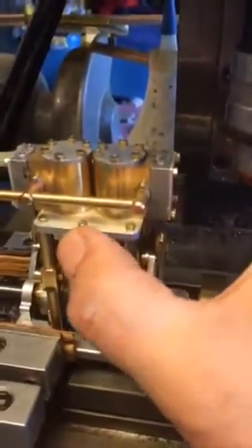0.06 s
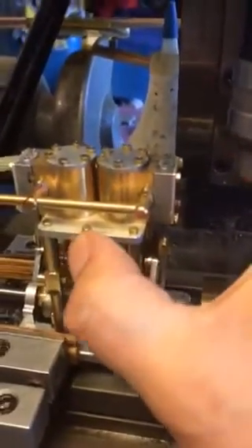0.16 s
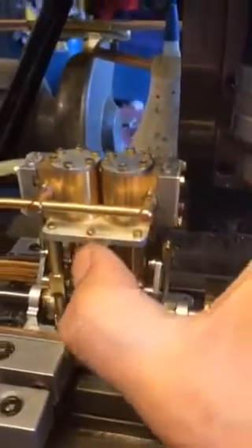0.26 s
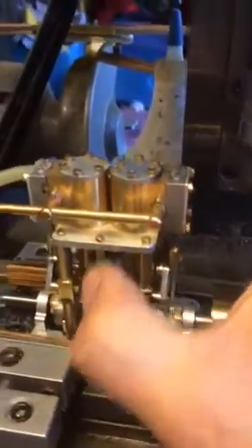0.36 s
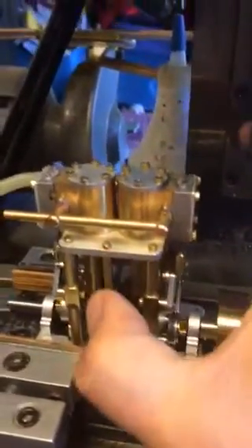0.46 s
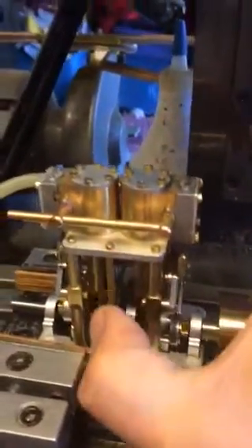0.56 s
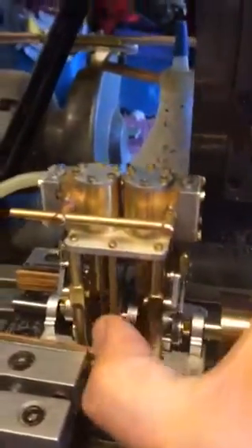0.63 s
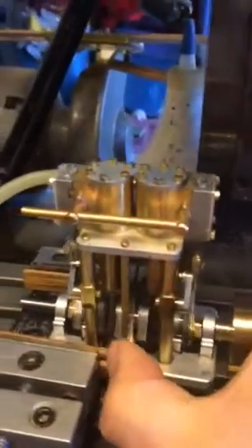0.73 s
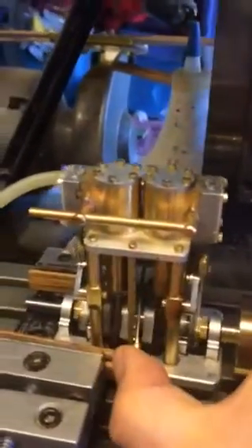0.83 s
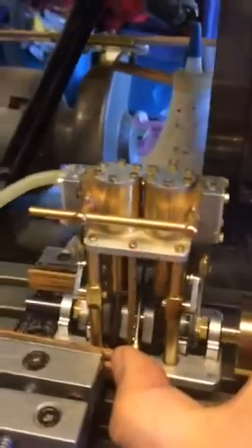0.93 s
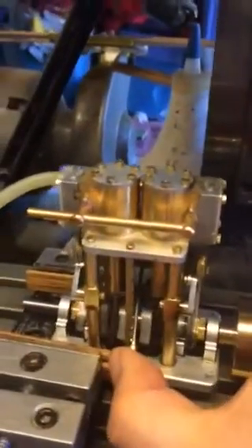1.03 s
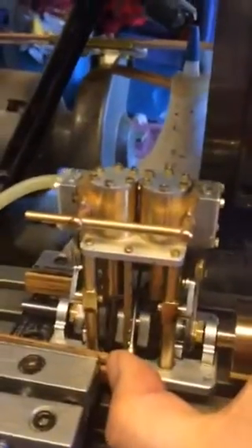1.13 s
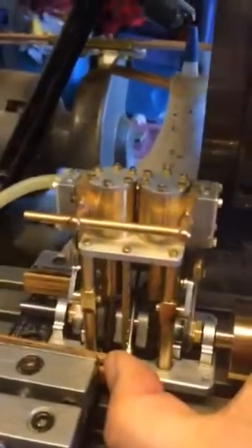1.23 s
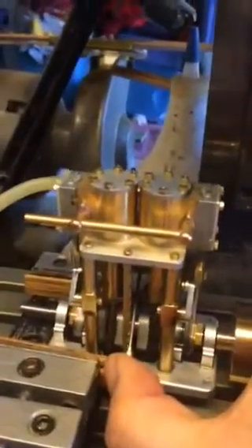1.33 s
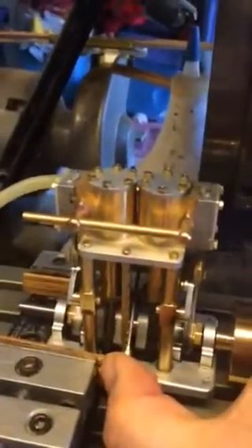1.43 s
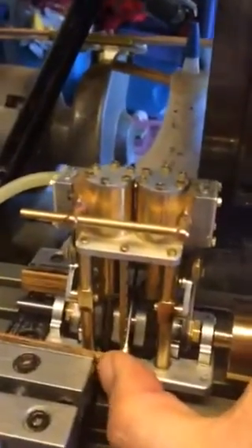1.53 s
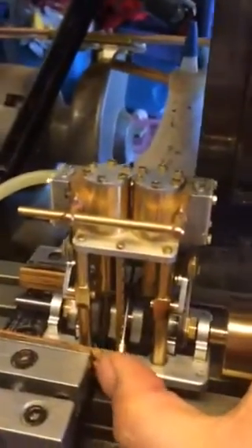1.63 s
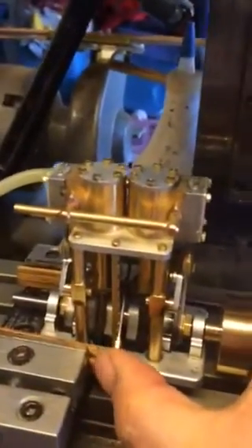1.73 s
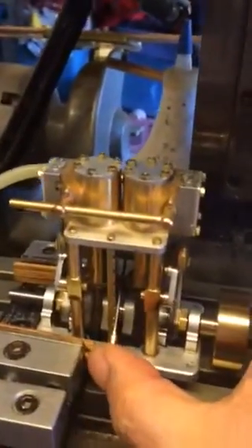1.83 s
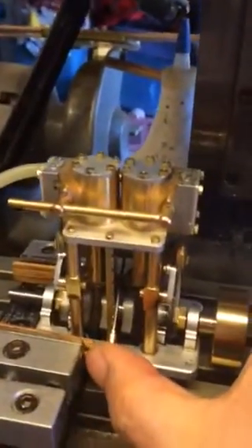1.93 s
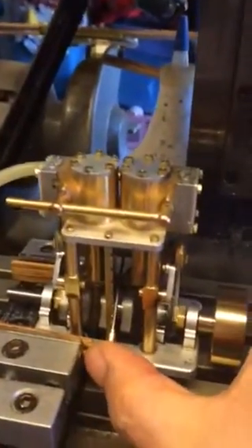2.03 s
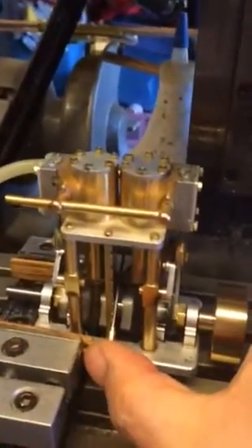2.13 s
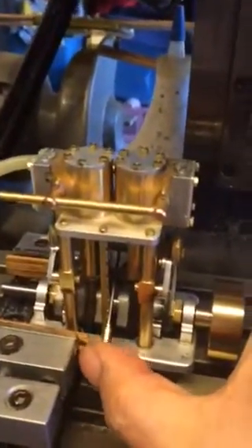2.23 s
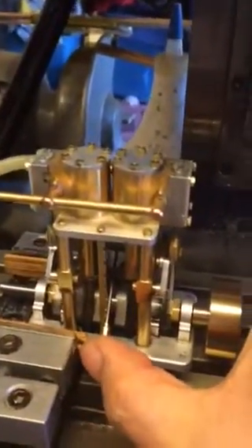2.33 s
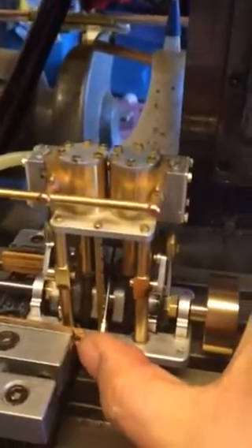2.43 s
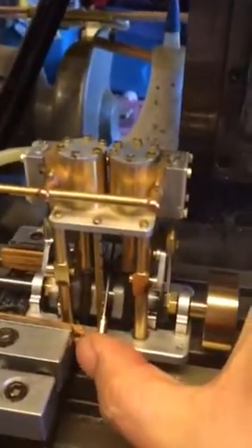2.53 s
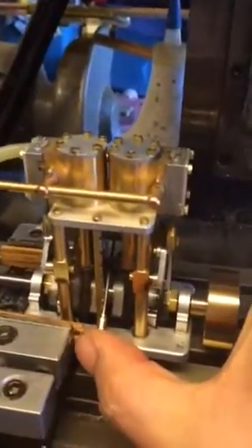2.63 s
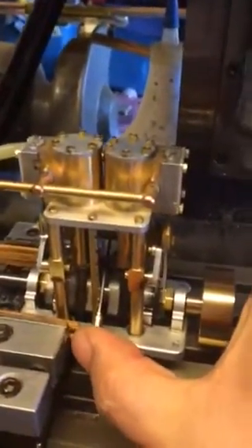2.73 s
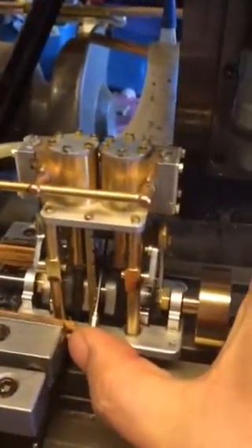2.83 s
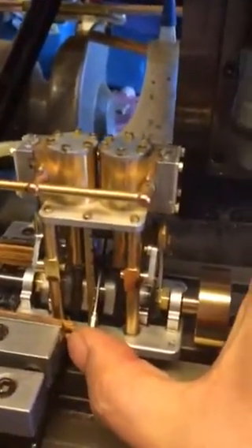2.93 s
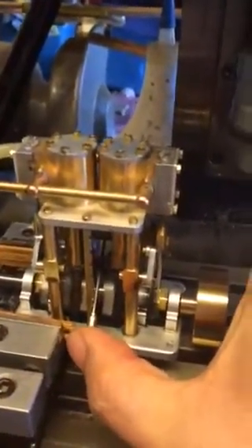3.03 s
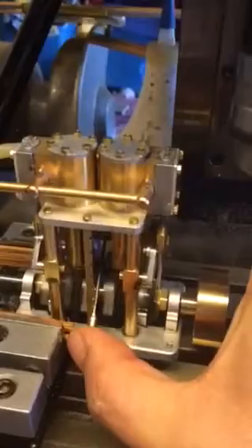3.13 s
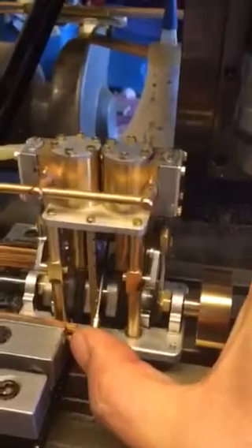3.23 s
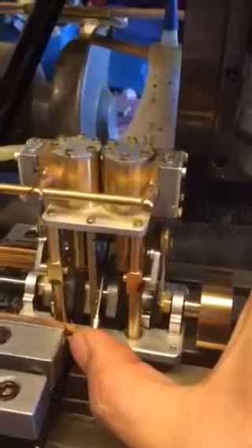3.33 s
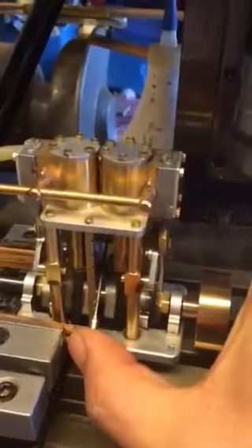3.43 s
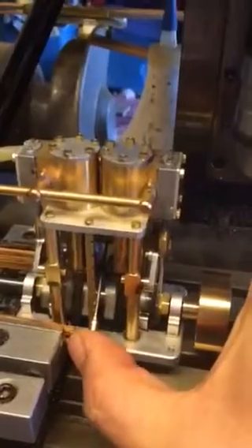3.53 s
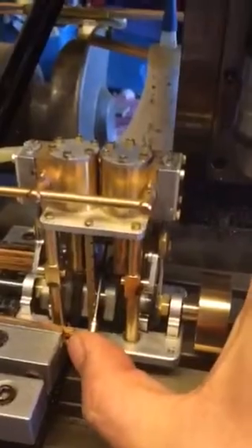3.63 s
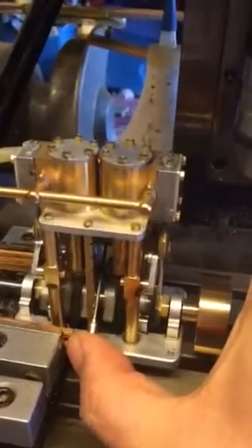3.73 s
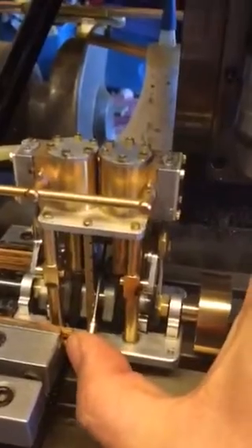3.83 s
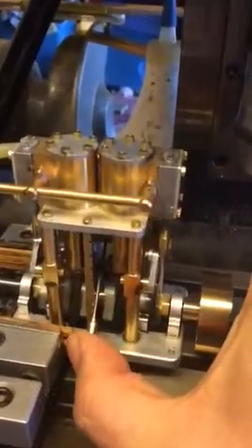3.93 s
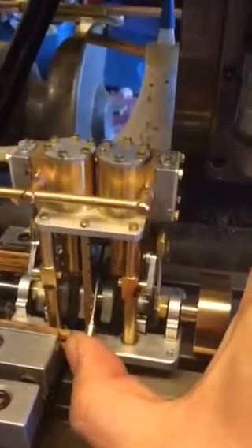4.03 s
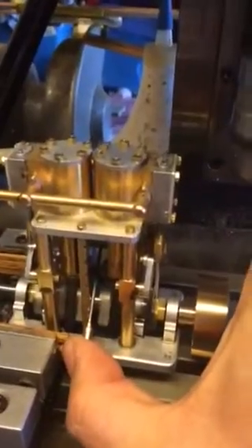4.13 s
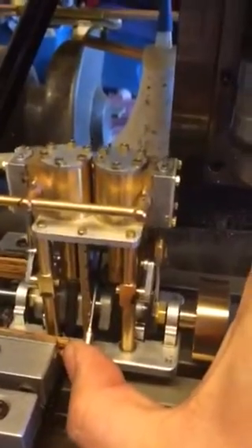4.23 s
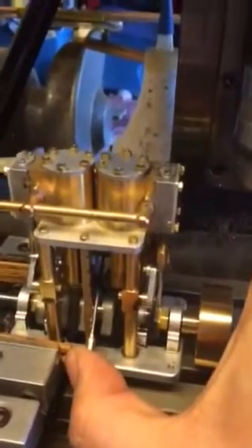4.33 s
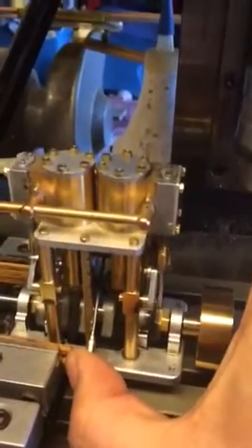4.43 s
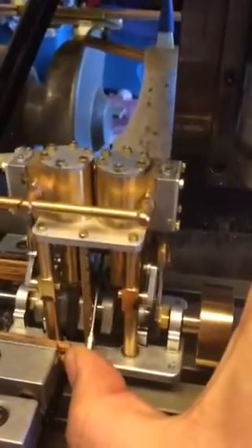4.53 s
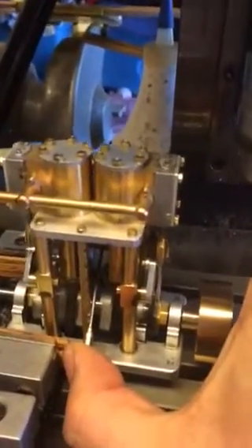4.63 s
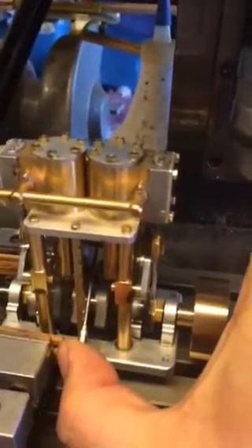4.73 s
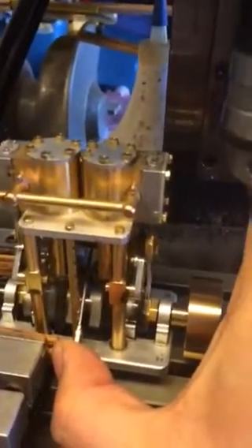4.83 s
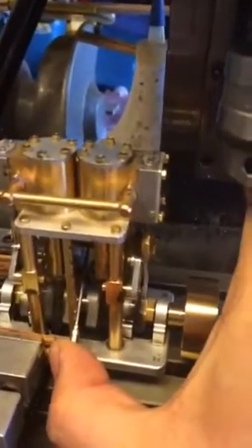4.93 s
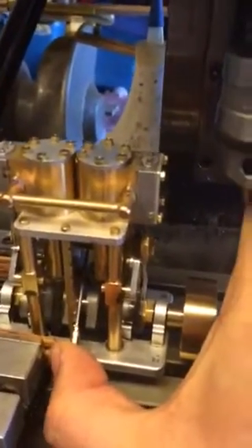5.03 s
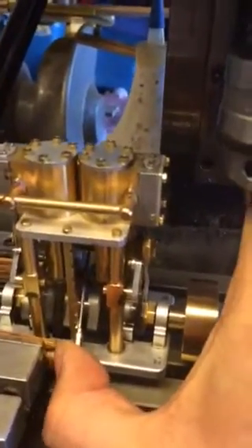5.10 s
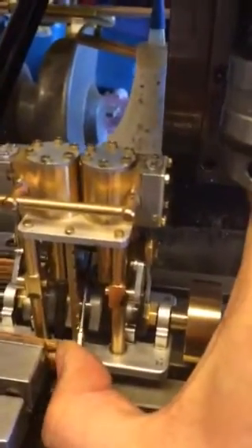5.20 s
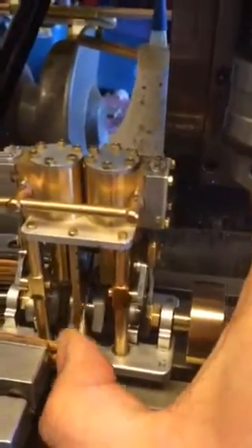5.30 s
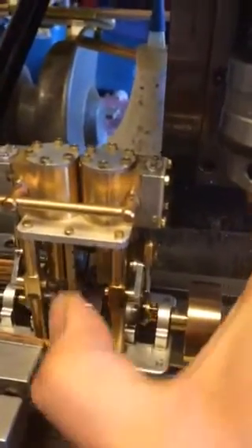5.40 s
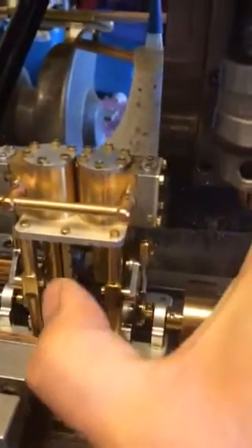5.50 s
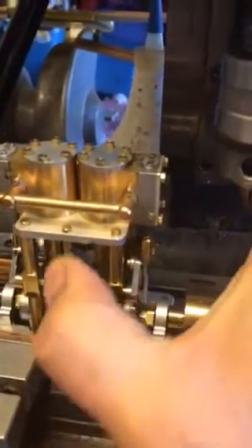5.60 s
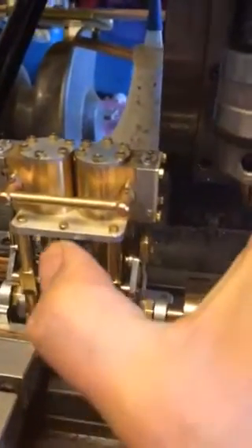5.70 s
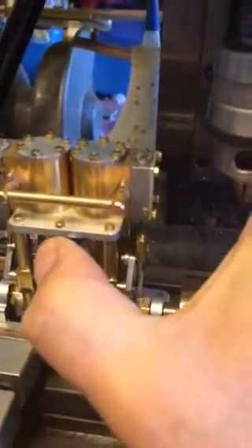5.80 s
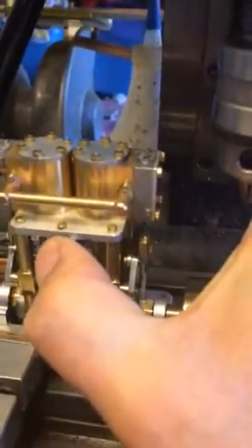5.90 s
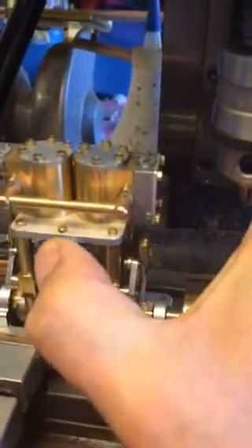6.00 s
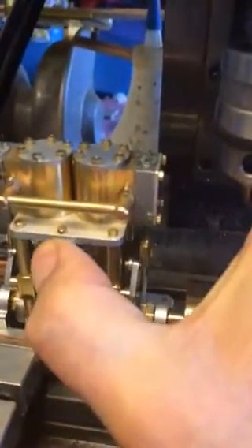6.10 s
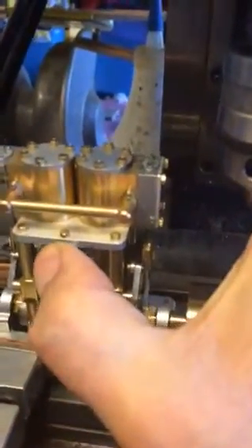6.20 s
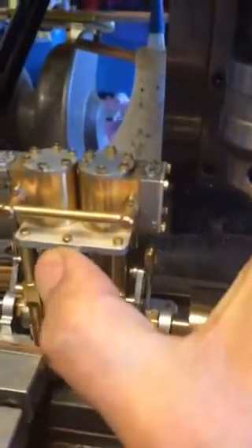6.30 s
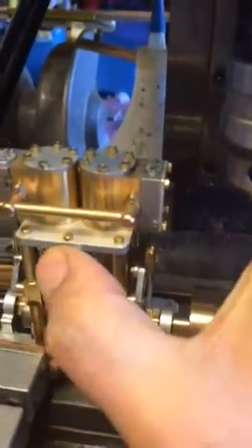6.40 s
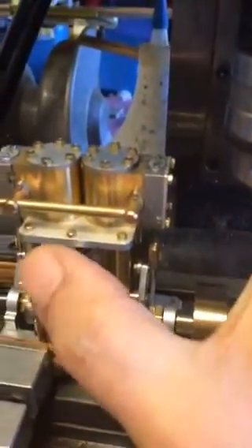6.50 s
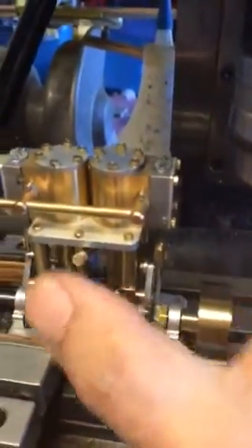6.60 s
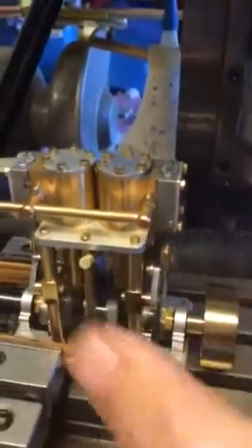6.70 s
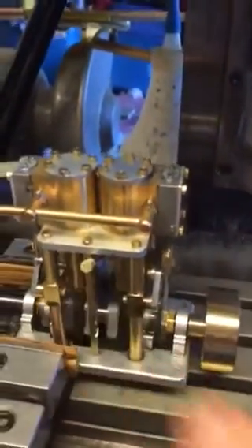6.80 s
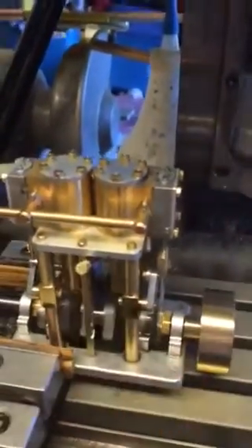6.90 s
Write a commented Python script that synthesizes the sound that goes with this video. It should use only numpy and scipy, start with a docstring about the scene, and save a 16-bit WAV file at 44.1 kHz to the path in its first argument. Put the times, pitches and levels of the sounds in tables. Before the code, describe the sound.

A small model steam engine runs fast on compressed air, close by, with a bright pulsing hiss over a buzzing drone and light, rapid metal knocking. Almost at once it stalls as the reversing lever clicks over, then spurts air and races off again. It runs steadily for several seconds, stops briefly once more with clicks and spurts, and resumes. Behind it is a quiet workshop.

```python
"""A small twin-cylinder model steam engine runs on compressed air, close by on a lathe bed.
Five uneven exhaust beats a turn make its drone. Air hisses from its ports (the cylinder openings)
in step with the crank, drops of oil spit, and the rods knock. Twice a thumb throws the reversing
lever: the engine stalls, spurts air and races off the other way, while the link rubs and clicks.
Behind it all is the low, steady noise of a quiet workshop."""
import sys
import numpy as np
from scipy import signal
from scipy.fft import rfft, irfft, next_fast_len
from scipy.io import wavfile

SR = 44100
rng = np.random.default_rng(int(sys.argv[2]) if len(sys.argv) > 2 else 0)


def bounce(signal):
    """Save signal as a 16-bit WAV file at the path given by the first command-line argument."""
    frames = np.transpose(np.atleast_2d(signal))
    limited = np.clip(frames, -1, 1)
    pcm = np.round(limited * 32767).astype(np.int16)
    wavfile.write(sys.argv[1], SR, pcm)


N = 306759
TIME = np.arange(N) / SR
FFT_SIZE = next_fast_len(N + 8192, True)
FREQS = np.fft.rfftfreq(FFT_SIZE, 1 / SR)

# How the crank moves in each run. Each row: start, stop and braking time in seconds,
# cruising speed and surge in turns per second, first angle in turns.
CRANK_RUNS = [(-2, .58, .05, 35.3435, 0, -.042), (.8084, 5.48, .0367, 39.8216, 35.9, .3548),
              (5.7029, 9, .05, 35.3123, 18.6, -.3594)]
# The air supply in each run. Each row, all in seconds: when it opens, how long that takes,
# when it shuts, how long the hiss lingers, how long the early boost takes to ease off.
AIR_RUNS = [(-1.5, .01, 0.473, 0.013, .1), (0.8445, 0.031, 5.408, 0.0041, .08),
            (5.737, 0.0028, 9, .01, 0.4)]
# Exhaust beats in one turn. Each row: crank angle in turns, size of the pressure drop,
# recovery in turns, size of the piston's thump.
FORWARD_BEATS = [(.088, .594, .029, .564), (.351, .641, .07, .773), (.546, .196, .01, .393),
                 (.633, .121, .008, .076), (.789, 0.75, 0.091, 0.65)]
BACKWARD_BEATS = [(.118, 0.2, 0.016, 0.51), (.36, .707, 0.046, .622), (.55, 1.626, 0.16, 0.61),
                  (.639, 0.41, 0.089, 0.24), (.816, 0.48, 0.044, 0.4)]
# Four ports each blow once a turn. Each row: crank angle and half width in turns, level in dB.
FORWARD_PORTS = [(.17, .07, -1.5), (.44, 0.12, 0.05), (0.608, .05, 0), (.875, .055, -2)]
BACKWARD_PORTS = [(.17, 0.081, -0.2), (.33, 0.12, 0), (.61, 0.094, -2.5), (.9, 0.065, -3)]
# Rod knocks in one turn. Each row: crank angle in turns, level in dB.
FORWARD_KNOCKS = [(.088, 7), (.36, 5), (.546, -3), (.625, 7), (.8, 2)]
BACKWARD_KNOCKS = [(0.117, 6.5), (0.36, 3), (.546, -8), (0.676, 5.5), (0.814, 0)]
# Resonances, the pitches at which a part likes to ring.
# Each row: pitch in Hz, width in Hz, level in dB going forward, level in dB going backward.
EXHAUST_TONES = [(118, 38.8, 15, 15), (395.4, 23, -5.5, -3.5), (576, 165, 4, 6), (728, 40, 7.5, 9.5),
                 (935, 57, -2, 0)]
PORT_TONES = [(3020, 550, -9.5, -10.5), (3810, 520, -9.5, -8.5), (5260, 950, -4, -2.5), (5820, 420, 0, 1.5),
              (6015, 280, -3, 2.5), (6730, 810, -4.5, -3), (7230, 560, -5, 1.5), (8040, 540, -4, -3),
              (8870, 460, -0.5, 0.5), (9280, 1500, -3.5, -4), (10000, 710, 0.5, 2), (11130, 920, -3.5, -1),
              (13000, 700, -5, -18), (13740, 470, -2.5, 1), (15400, 830, 0, 5)]   # ports and steam chests
FRAME_TONES = [(560, 69, -17, 11.5), (702, 54, 9, 2), (950, 200, 10, -12), (1297, 81, 10.5, 4.5),
               (1480, 190, -16, -2.5), (1680, 73, 6, -15), (2044, 67, 8.5, 6), (2320, 500, -2.5, -6.5),
               (3100, 160, 0, -5), (3290, 380, -3, -0.5), (3540, 260, -1, -13.5)]   # frame and rods
CROSSHEAD_TONES = [(1762, 28, 12, -29), (1970, 180, -0.5, -4), (2990, 59, 1, 0.5), (3340, 72, 3, -6),
                   (3980, 340, -6, 3)]   # the sliding joint at the end of a piston rod
# The tone of swirling exhaust air. Each row: frequency in Hz, level in dB.
RUSH_SPECTRUM = [(25, -16), (60, -3.5), (95, -0.5), (200, 2.5), (290, -4), (380, -1.5), (500, -2.5),
                 (650, -4.5), (950, -2), (1130, -7.5), (1900, -3), (2600, -8.5), (6000, -21.5),
                 (15000, -26)]
# Air spurts and link rubs. Each row: time of the peak in seconds, level in dB, length in seconds.
AIR_SPURTS = [(0.5, -24, 0.0091), (0.536, -54, 0.014), (.76, -54, 0.024), (0.811, -34, 0.0085),
              (.8225, -19.5, 0.0081), (0.84, -18, 0.0064), (.857, -16.5, 0.0063), (5.436, -29, 0.0029),
              (5.444, -29, 0.0042), (5.467, -48, 0.0043), (5.689, -22, 0.0042), (5.702, -23.5, 0.0034),
              (5.7425, -25, 0.0083), (5.773, -30, 0.0055)]
LINK_RUBS = [(.51, -46, 0.036), (.62, -69, .06), (.71, -51, 0.037), (.78, -53, 0.061), (5.44, -45, 0.042),
             (5.53, -64, .06), (5.71, -43.5, 0.037)]
# The link hits its stops. Each row: start in seconds, ring level in dB, snap level in dB.
LINK_HITS = [(.537, -51, -52), (.789, -60, -37), (.811, -40, -42), (5.392, -36, -24), (5.4597, -40, -27.5),
             (5.52, -58, -56), (5.666, -40.5, -30.5)]
# The lever clinks home. Each row: start in seconds, level in dB.
LEVER_HITS = [(.69, -48), (5.521, -37)]
# Resonances of the sliding link and the lever. Each row: pitch in Hz, width in Hz, level in dB.
LINK_TONES = [(125, 61, 2.5), (325, 50, -15), (520, 22, -4), (800, 330, -20), (1640, 160, -18.5),
              (2750, 250, -21)]
LEVER_TONES = [(553, 24, -9.5), (600, 30, -15), (1227, 65, -20), (1730, 60, -19)]
# The tone of the workshop background. Each row: frequency in Hz, level in dB.
WORKSHOP_SPECTRUM = [(25, -13), (60, -0.5), (170, -1.5), (300, -10), (430, -10), (650, -19), (1500, -24),
                     (3000, -26.5), (4400, -35), (6000, -30), (10000, -30), (15000, -24)]


def engine(run, forward, beat_db, hiss_db, knock_db, rush_db, spit_db,
           slap_db, slap_angle, jet_angle, jet_turns, jet_db):
    """One run of the engine: drone, knocks, slaps, rush, hiss and oil spit all follow the crank."""
    beats = FORWARD_BEATS if forward else BACKWARD_BEATS
    rods = FORWARD_KNOCKS if forward else BACKWARD_KNOCKS
    ports = FORWARD_PORTS if forward else BACKWARD_PORTS
    angle = crank_angle(*CRANK_RUNS[run])
    beat_gain, hiss_gain = air_supply(*AIR_RUNS[run])
    levelled = lambda x: x / np.std(x[beat_gain > .5])   # strength 1 while the air is on
    port_colour = humps(one_way(PORT_TONES, forward))
    hiss, opening = port_hiss(angle, ports, port_colour, jet_angle, jet_turns, jet_db)
    spit = from_db(spit_db) * levelled(oil_spit(opening, port_colour))
    knock = from_db(knock_db) * levelled(rod_knocks(angle, rods, one_way(FRAME_TONES, forward)))
    slap = crosshead_slaps(angle, slap_angle, one_way(CROSSHEAD_TONES, forward))
    slap = from_db(slap_db) * levelled(slap)
    rush = from_db(rush_db) * levelled(exhaust_rush(angle, beats))
    drone = levelled(exhaust_drone(angle, beats, one_way(EXHAUST_TONES, forward)))
    beating = from_db(beat_db) * beat_gain * (drone + knock + slap + rush)
    return beating + from_db(hiss_db) * hiss_gain * (levelled(hiss) + spit)


def crank_angle(start, stop, brake_s, cruise, surge, first_angle):
    """Turns made so far: the flywheel spins up, overshoots on pent-up air, sags, cruises and brakes."""
    spin_up_s, surge_s, sag_s, sag_share = .0506, .0689, .494, .0192
    age, left = np.maximum(TIME - start, 0), np.maximum(stop - TIME, 0)
    drive = cruise + surge * (np.exp(-age / surge_s) - sag_share * np.exp(-age / sag_s))
    speed = drive * (1 - np.exp(-age / spin_up_s)) * (1 - np.exp(-left / brake_s))
    return first_angle + np.cumsum(speed) / SR


def air_supply(opens, opening_s, shuts, hiss_fade_s, easing_s, beat_fade_s=.021):
    """Loudness of beats and hiss: a kick of pressure, a small boost, a steady hold, then a fade."""
    kick_db, kick_s, boost_db, boost_s = 4.5, .2, 1.43, .837
    hiss_kick_s = .18
    age, since_shut = np.maximum(TIME - opens, 0), np.clip(TIME - shuts, 0, .5)
    boost = from_db(boost_db * np.clip(.5 + (boost_s - age) / easing_s, 0, 1))
    held = np.clip(age / opening_s, 0, 1) * boost
    beats = from_db(kick_db * np.exp(-age / kick_s)) * np.exp(-since_shut / beat_fade_s)
    hiss = from_db(kick_db * np.exp(-age / hiss_kick_s)) * np.exp(-since_shut / hiss_fade_s)
    return held * beats, held * hiss


def exhaust_drone(angle, beats, tones, thump_turns=.03, shudder_turns=.0016, low_cut_hz=198):
    """Each beat is a short thump and a sudden pressure drop that recovers; the exhaust rings along."""
    k = np.arange(40)   # harmonics: whole multiples of the crank's speed
    thump_shape = np.exp(-(np.pi * k * thump_turns) ** 2)
    harmonics = 0
    for at, drop, recovery, thump in beats:
        beat = thump * thump_shape - drop / (1 + 2j * np.pi * k * recovery)
        harmonics += np.exp(-2j * np.pi * k * at) * beat
    one_turn = irfft(harmonics * (k > 0), 1024)
    shaky_angle = angle + shudder_turns * drift(150)
    pressure = np.interp(shaky_angle, np.arange(1024) / 1024, one_turn, period=1)
    pressure *= 1 + .045 * drift(170)   # no two beats are equally strong
    sound = coloured(pressure, (1j * FREQS / (1j * FREQS + low_cut_hz)) ** 2)
    return sound + ring(sound, tones)


def exhaust_rush(angle, beats, fade_turns=.14):
    """Swirling air flares up at each beat and sinks before the next."""
    flare = 1.5 + sum(thump * np.exp(-((angle - at) % 1) / fade_turns) for at, _, _, thump in beats)
    return flare * noise(slope(RUSH_SPECTRUM))


def port_hiss(angle, ports, colour, jet_angle, jet_turns, jet_db, closed_leak_db=-6):
    """The valves let air hiss through; once a turn a port cracks open with a sharper, fading jet."""
    flow = sum(from_db(db) ** 2 * np.exp(-(((angle - at + .5) % 1 - .5) / width) ** 2)
               for at, width, db in ports)
    flicker = from_db(.57 * drift(140) + .59 * drift(1100))
    opening = np.sqrt(flow + from_db(closed_leak_db) ** 2) * flicker
    crack = np.exp(-((angle - jet_angle) % 1) / jet_turns)
    jet = from_db(jet_db + 1.6 * drift(60)) * crack * noise(colour * (FREQS / 12000) ** 2.2)
    return opening * noise(colour) + jet, opening


def oil_spit(opening, colour):
    """Oil drops burst in the ports, most often when these are wide open."""
    sizes = rng.uniform(-1, 1, N)
    bursts = rng.random(N) < 260 * opening ** 2 / SR
    return coloured(sizes * bursts, colour * FREQS / SR)


def rod_knocks(angle, rods, tones, scatter_db=5, play_turns=.006):
    """The rods take up their slack at each stroke and ring the frame, never twice with the same force."""
    clicks, turns = np.zeros(N), np.arange(int(angle[-1]) + 1)
    for at, db in rods:
        timing, force = rng.uniform(-1, 1, (256, 2))[:len(turns)].T
        when = np.searchsorted(angle, turns + at + play_turns * timing)
        clicks[when[when < N]] += from_db(db + scatter_db * force[when < N])
    return ring(clicks, tones)


def crosshead_slaps(angle, at, tones, alternation=.2):
    """A loose crosshead slaps and rings, tending to hit harder on every second turn."""
    clicks, turns = np.zeros(N), np.arange(int(angle[-1]))
    force = np.clip(rng.random(256)[:len(turns)] + alternation * (turns % 2 - .5), 0, 1)
    when = np.minimum(np.searchsorted(angle, turns + at), N - 1)
    clicks[when] = force
    return ring(clicks, tones)


def air_spurts(leak_db, thud_db):
    """Air leaks faintly all the time, and bursts from a port as the engine stalls or starts."""
    swell = swells(AIR_SPURTS)
    hiss = (swell + from_db(leak_db)) * noise(humps(one_way(PORT_TONES, forward=True)))
    thud = from_db(thud_db) * swell * noise(slope(RUSH_SPECTRUM))
    return hiss + thud


def reversing_link(ring_s, snap_s):
    """The link that reverses the engine slides across with a dull rub and clicks against its stops."""
    fade = lambda start, length: (TIME >= start) * np.exp(-np.minimum(abs(TIME - start) / length, 50))
    frame = noise(humps(one_way(FRAME_TONES, forward=True)))
    frame *= sum(from_db(db) * fade(start, ring_s) for start, db, _ in LINK_HITS)
    snap = noise(humps(one_way(PORT_TONES, forward=True)))
    snap *= sum(from_db(db) * fade(start, snap_s) for start, _, db in LINK_HITS)
    rub = swells(LINK_RUBS) * noise(humps(LINK_TONES))
    return frame + snap + rub


def lever_clinks():
    """The lever rings with a few short tones when it reaches its end."""
    out = np.zeros(N)
    for start, hit_db in LEVER_HITS:
        age = np.maximum(TIME - start, 0)
        for hz, width, db in LEVER_TONES:
            fade = np.exp(-np.minimum(np.pi * width * age, 20))
            out += from_db(hit_db + db) * np.sin(2 * np.pi * hz * age) * fade
    return out


def workshop(sound, echo_s, echo_db, background_db):
    """Add quick echoes from the lathe and the walls, and the room's steady noise."""
    fade = from_db(-60 * np.minimum(TIME / echo_s, 4)) * (TIME > .003)
    low_cut = signal.butter(2, 1500, "high", fs=SR, output="sos")
    tail = signal.sosfilt(low_cut, rng.standard_normal(N) * fade)
    echoes = coloured(sound, rfft(tail / np.sqrt(np.sum(tail ** 2)), FFT_SIZE))
    return sound + from_db(echo_db) * echoes + from_db(background_db) * noise(slope(WORKSHOP_SPECTRUM))


def from_db(db):
    """Turn decibels into a number to multiply by."""
    return 10 ** (np.asarray(db) / 20)


def rms_one(x):
    """Scale a signal so that its average strength (rms) is 1."""
    return x / np.sqrt(np.mean(x ** 2) + 1e-20)


def drift(rate):
    """A random wander that picks a new value `rate` times a second."""
    return rms_one(np.interp(TIME * rate, np.arange(8192), rng.standard_normal(8192)))


def coloured(x, colour):
    """Filter a sound by a colour: one gain for each frequency."""
    return irfft(rfft(x, FFT_SIZE) * colour, FFT_SIZE)[:N]


def noise(colour):
    """Noise of a given colour, at strength 1."""
    return rms_one(coloured(rng.standard_normal(N), colour))


def slope(points):
    """A colour drawn through (Hz, dB) points."""
    hz, db = np.transpose(points)
    return from_db(np.interp(np.log(FREQS + 1), np.log(hz), db))


def humps(tones):
    """A colour with a broad hump at each resonance."""
    return np.sqrt(sum(from_db(db) ** 2 / (1 + ((FREQS - hz) / width) ** 2 * 2) ** 2
                       for hz, width, db in tones))


def ring(x, tones):
    """Let a sound ring each resonance, and add the results with alternating signs."""
    out = 0
    for k, (hz, width, db) in enumerate(tones):
        r = np.exp(-np.pi * width / SR)   # share of the ringing left after one sample
        feedback = [1, -2 * r * np.cos(2 * np.pi * hz / SR), r * r]
        ringing = signal.lfilter([1, 0, -1], feedback, x + 1e-18)
        out += (-1) ** k * from_db(db) * (1 - r * r) / 2 * ringing
    return out


def one_way(tones, forward):
    """Pick each resonance's level for one direction of running."""
    return [(hz, width, fore if forward else back) for hz, width, fore, back in tones]


def swells(rows):
    """A smooth rise and fall in loudness for each row."""
    return sum(from_db(db) * np.exp(-2 * ((TIME - peak) / length) ** 2) for peak, db, length in rows)


def scene():
    """The engine runs backward, forward, then backward again in a quiet workshop."""
    near = engine(0, forward=False, beat_db=-35, hiss_db=-27, knock_db=-8, rush_db=-8, spit_db=-17,
                  slap_db=-16, slap_angle=.2, jet_angle=.22, jet_turns=.11, jet_db=-6)
    near += engine(1, forward=True, beat_db=-33, hiss_db=-27, knock_db=-12, rush_db=-7, spit_db=-16.5,
                   slap_db=-11.5, slap_angle=.0309, jet_angle=.575, jet_turns=.056, jet_db=-2.5)
    near += engine(2, forward=False, beat_db=-35, hiss_db=-26.5, knock_db=-9, rush_db=-9.3, spit_db=-19,
                   slap_db=-13, slap_angle=.22, jet_angle=.22, jet_turns=.089, jet_db=-2)
    near += air_spurts(leak_db=-68.5, thud_db=-13.5)
    near += reversing_link(ring_s=.007, snap_s=.0022) + lever_clinks()
    return workshop(near, echo_s=.12, echo_db=-13, background_db=-57)[None]


def record(dry):
    """Cut off the very highest treble steeply."""
    cutoff_hz = 15320
    return signal.sosfilt(signal.ellip(12, .1, 80, cutoff_hz, fs=SR, output="sos"), dry)


dry = scene()
out = record(dry)
bounce(out)
```